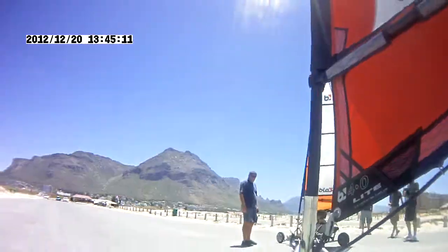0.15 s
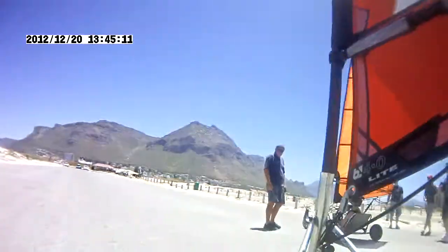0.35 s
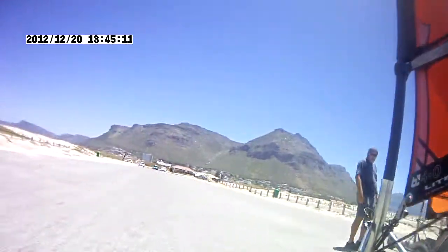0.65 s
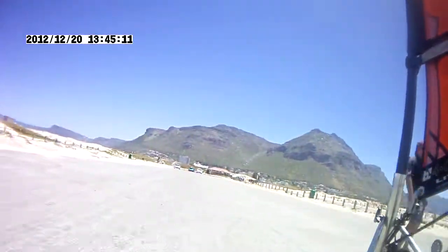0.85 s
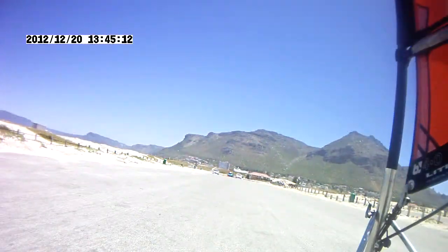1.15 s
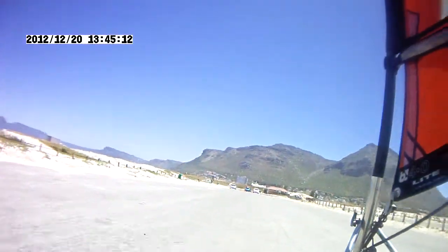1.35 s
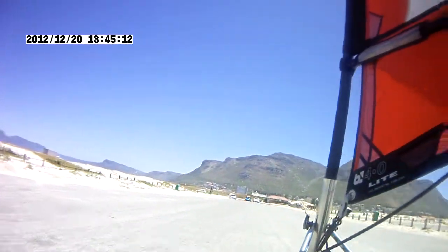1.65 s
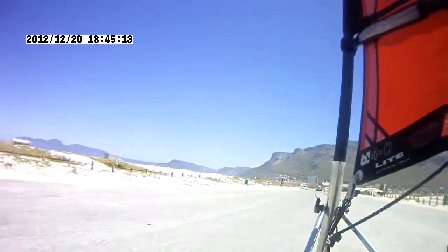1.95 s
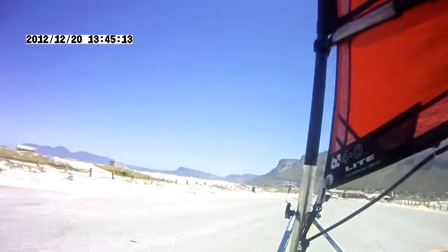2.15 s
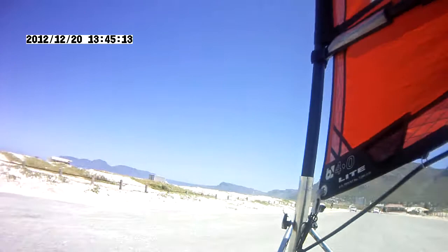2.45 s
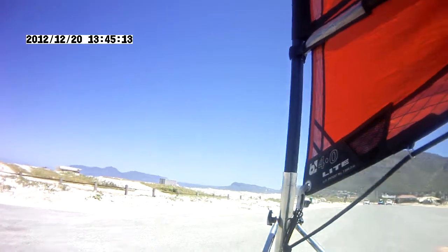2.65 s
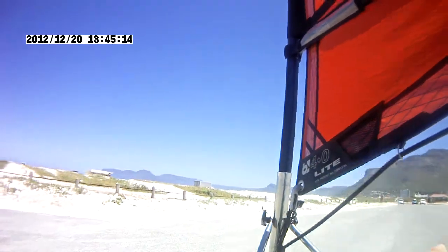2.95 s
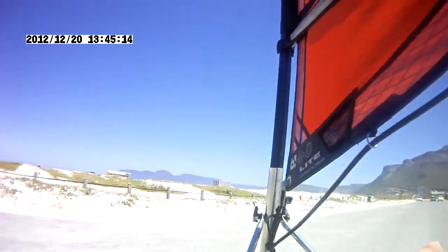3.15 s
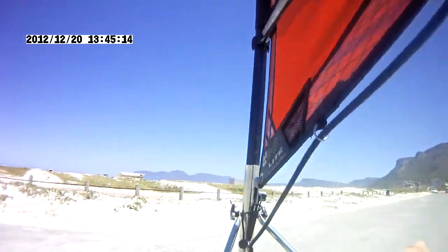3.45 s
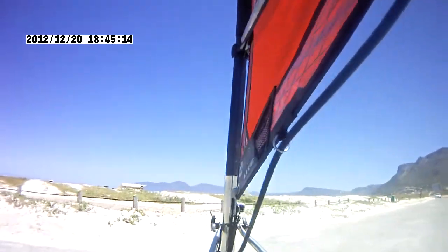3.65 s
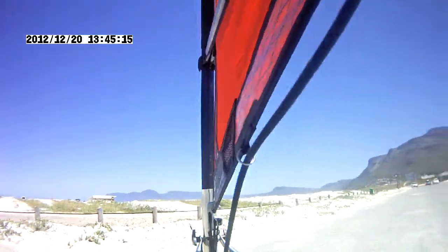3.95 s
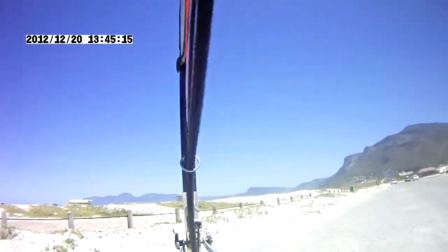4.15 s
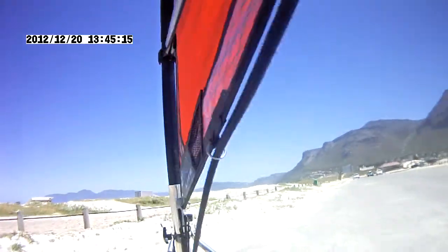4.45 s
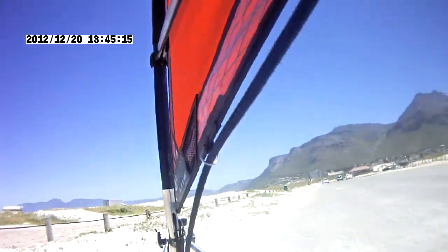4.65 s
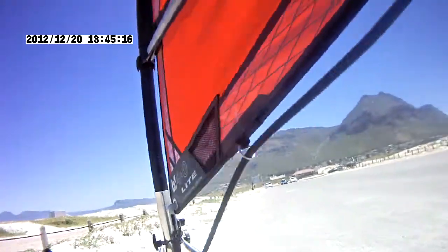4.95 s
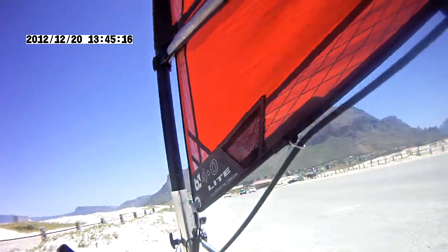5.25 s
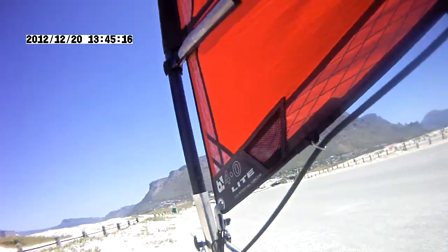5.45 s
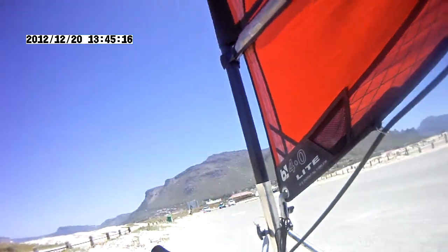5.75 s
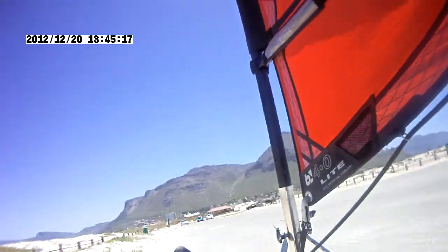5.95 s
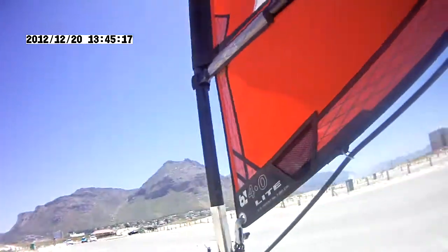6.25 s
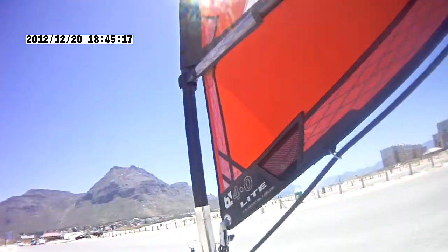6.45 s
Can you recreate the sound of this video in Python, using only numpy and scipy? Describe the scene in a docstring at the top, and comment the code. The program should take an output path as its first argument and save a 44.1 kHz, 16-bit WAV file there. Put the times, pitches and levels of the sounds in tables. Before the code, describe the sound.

Tyres crackle and hiss over gritty ground as a loose fitting knocks sharply on a metal frame, densest from one to three and a half seconds.

```python
"""On gritty pavement a land yacht rolls along, heard from close by: a small camera fixed to its frame.
A loose fitting knocks on the frame as the sail flaps, and rigging ticks: blows ring decaying modes.
Grit crackles under the tyres as swells of grains; the road drones in the frame's resonances.
Filtered grains and noise make the sandy hiss, the brief swishes, the rumble, the wind and the camera's floor."""
import sys
import numpy as np
from scipy import signal
from scipy.io import wavfile
from scipy.ndimage import uniform_filter1d

SR = 44100
rng = np.random.default_rng(int(sys.argv[2]) if len(sys.argv) > 2 else 0)


def output_pcm(signal):
    """Save a mono or channel-first signal as 16-bit PCM at the path in sys.argv[1].

    Samples are clipped to [-1, 1] before scaling.
    """
    pcm = np.clip(np.atleast_2d(signal).T, -1, 1) * 32767
    wavfile.write(sys.argv[1], SR, np.round(pcm).astype(np.int16))


N = 291501

# loose fitting on the frame, the clear blows: (time [s], peak level [dB], contact time [microseconds])
BLOWS = [(0.7087, -10, 22), (1.0981, -10, 35), (1.1848, -12, 12), (1.1907, -3.5, 6), (1.2355, -20, 82),
         (1.2471, -3, 14), (1.2798, -24, 63), (1.2987, -20, 50), (1.4753, -5.5, 24), (1.5048, -22, 37),
         (1.5517, -28, 17), (1.5683, -18.5, 41), (1.5799, -4, 21), (1.6522, -24, 42), (1.663, -30, 30),
         (1.6948, -25.5, 104), (1.7154, -26.5, 45), (1.7729, -31, 100), (1.898, -21, 26),
         (1.9076, -12.5, 31), (1.9877, -24.5, 54), (2.0467, -27.5, 100), (2.1915, -6, 14), (2.231, -24, 35),
         (2.2398, -23.5, 7.6), (2.2474, -13, 38), (2.1435, -34.5, 64), (2.2987, -28, 71), (2.3054, -35, 60),
         (2.346, -23.5, 11), (2.3659, -18, 53), (2.3946, -23.5, 23), (2.4719, -11, 34), (2.5267, -24, 78),
         (2.58, -8.5, 32), (2.6321, -18, 39), (2.6858, -19.5, 48), (2.7118, -24.5, 40), (2.7678, -24, 61),
         (2.7802, -4, 21), (2.8963, -5, 24.5), (2.9397, -24, 46), (2.9715, -31, 70), (3.0029, -19, 27),
         (3.011, -17.5, 61), (3.0689, -7, 23.5), (3.3047, -18, 39), (3.412, -9, 26), (3.486, -28, 59),
         (3.7582, -33.5, 77), (4.5269, -29, 33), (4.5806, -35, 20), (4.64, -27, 73), (4.6552, -0.5, 5.4),
         (4.844, -34.5, 9.6), (4.9431, -33.5, 82), (5.1943, -37, 10), (5.2048, -40, 11), (5.4823, -31, 51),
         (5.6153, -30.5, 18), (6.0945, -24, 32), (6.1003, -20.5, 73)]
# what a blow on the frame rings with:
# (frequency [Hz], decay by 60 dB [s], relative level [dB], polarity and weight [factor])
FRAME_MODES = [(139, 0.015, -31.5, -1.05), (410, 0.036, -40.5, 0.63), (596, 0.0082, -19.5, -0.75),
               (753, 0.031, -19, -0.93), (956, 0.046, -27, -0.96), (1113, 0.033, -12, -0.71),
               (1545, 0.017, -8, 0.97), (1745, 0.019, -9, 0.96), (2063, 0.0061, -0.87, 0.89),
               (2446, 0.023, -13, 0.99), (3060, 0.0095, -10, -1.46), (3690, 0.0037, 1.5, -1.134),
               (4318, 0.0038, 3.5, 1), (4943, 0.01, -4, -1.02), (5600, 0.01, -10, 1),
               (6130, 0.012, -13.5, -1.86), (6576, 0.0082, -3.5, -0.81), (7486, 0.0034, 0.5, 1),
               (9100, 0.0081, -18, 0.96), (9720, 0.01, -18.5, 0.97)]
# hull and ground send the blow back: (lag [s], level [dB])
FRAME_ECHOES = [(.00217, 2.16), (.00384, -7.5), (.00635, -11)]
ECHO_HZ = 1300  # the echoes lose what lies above
# faint taps at random: level over the grit, spread above that, typical contact time
TAP_OVER_GRIT_DB, TAP_SPREAD_DB, TAP_CONTACT_US = 14.5, 3, 25


def knocks(grit_db):
    """A softer contact pushes longer and loses treble; chatter surrounds the blow, more so in light ones."""
    out = np.zeros(N)
    t = np.arange(-200, 401) / SR
    taps = scattered(28, grit_db, TAP_OVER_GRIT_DB, TAP_SPREAD_DB, TAP_CONTACT_US)
    for s, db, contact_us in [*BLOWS, *taps]:
        push = np.exp(-.5 * (1e6 * t[150:251] / max(contact_us, 4)) ** 2)
        swell = np.exp(np.where(t < 0, t / 0.001, -t / 0.0013))
        chatter = band(swell * rng.standard_normal(len(t)), 3740, 9600)
        blow = (t == 0) + undb(-27.5 - 0.43 * db) * chatter
        answer = ring(FRAME_MODES, 1.5, FRAME_ECHOES)
        add(out, s, db, signal.fftconvolve(np.convolve(blow, push), answer))
    return out


# light metal ticks in the rigging: (time [s], peak level [dB])
RIGGING_TICKS = [(1.5606, -37), (2.7992, -28), (3.703, -40), (3.7755, -32.5), (4.3327, -26), (4.7324, -32),
                 (4.778, -28.5), (4.7964, -27.5), (4.804, -18.5), (4.816, -31), (4.827, -25), (4.981, -33),
                 (5.164, -33), (6.4967, -33)]
# what a tick rings with:
# (frequency [Hz], decay by 60 dB [s], relative level [dB], polarity and weight [factor])
RIGGING_MODES = [(2840, 0.0073, -4, 0.72), (4000, 0.0081, 1.5, -0.59), (4550, 0.004, -2, 0.31),
                 (5260, 0.014, -1.5, -0.37), (6300, 0.0046, -6.5, 0.87), (7400, 0.011, -20, -0.75),
                 (8850, 0.0066, -15, 0.91), (10600, 0.012, -33, -1.1)]


def ticks():
    """Each tick strikes the small metal parts in another spot and rattles for a moment."""
    out = np.zeros(N)
    t = np.arange(200) / SR
    for s, db in RIGGING_TICKS:
        noise = band(rng.standard_normal(len(t)), 4000, 5000)
        rattle = (t == 0) + 0.25 * np.exp(-t / 0.0008) * noise
        add(out, s, db, signal.fftconvolve(rattle, ring(RIGGING_MODES, 2.0)))
    return out


# the heaviest patches of grit crushed under a tyre: (middle [s], length [s], level of the wide band [dB])
HEAVY_PATCHES = [(0.61, 0.011, -52.5), (0.636, 0.0054, -49), (0.661, 0.02, -51), (0.927, 0.041, -51),
                 (1.233, 0.039, -44), (1.27, 0.027, -42), (1.456, 0.073, -47.5), (1.528, 0.013, -44),
                 (1.557, 0.015, -40.5), (1.696, 0.024, -51), (2.218, 0.026, -51), (2.375, 0.017, -50),
                 (2.452, 0.025, -50), (2.537, 0.074, -50), (2.66, 0.053, -50), (2.708, 0.013, -49),
                 (2.758, 0.028, -45), (2.988, 0.021, -41.5), (3.044, 0.015, -43), (3.128, 0.026, -50),
                 (3.434, 0.015, -46.5), (3.516, 0.015, -48.5), (3.699, 0.019, -46.5), (3.785, 0.032, -51.5),
                 (3.831, 0.01, -50.5), (4.05, 0.0097, -50.5), (5.167, 0.018, -42), (5.462, 0.0094, -47),
                 (6.172, 0.025, -51), (6.534, 0.0091, -47), (6.578, 0.0075, -47)]
# lighter patches at random: level over the grit, spread above that, typical length
PATCH_OVER_GRIT_DB, PATCH_SPREAD_DB, PATCH_S = 1, 0.9, .018
CRUNCH_HZ, CRUNCH_OCT_PER_DB = 3330, -.05  # at grit of -57 dB; coarser, louder grit crunches lower


def crunches(grit_db):
    """Each patch is a swell of dense grains in a wide band, with a little of the frame's drone."""
    out = np.zeros(N)
    offset = np.arange(-2000, 2000)
    grit = unit(rng.standard_normal(N) + 1.9 * unit(grains(1500, 4.5, 16.0)))
    light = scattered(55, grit_db, PATCH_OVER_GRIT_DB, PATCH_SPREAD_DB, PATCH_S)
    for s, length, db in [*HEAVY_PATCHES, *light[:, [0, 2, 1]]]:
        middle = int(s * SR)
        at = np.clip(middle + offset, 0, N - 1)
        hz = CRUNCH_HZ * 2 ** (CRUNCH_OCT_PER_DB * (grit_db[middle] + 57))
        wide = unit(band_twice(grit[at], hz, 0.61 * hz))
        frame = unit(band(grit[at], 1520, 440))
        swell = np.exp(-(offset / SR / (0.42 * length)) ** 2)
        out[at] += undb(db) * swell * (wide + 0.62 * frame)
    return out


# how the road sounds along the way:
# (time [s], frame drone level [dB], grit reference level [dB], sand level [dB])
ROAD = [(0.0, -58, -70, -59), (0.64, -54.5, -64, -61), (0.83, -53, -62.5, -52), (1.21, -51, -57.5, -56),
        (1.4, -47.5, -54, -57), (1.93, -49, -55.5, -57), (2.17, -49, -54.5, -63), (2.56, -54.5, -50, -59),
        (2.85, -48, -53, -65.5), (3.22, -51.5, -55.5, -63), (3.92, -61, -64, -61), (4.4, -58.5, -60.5, -58),
        (4.69, -53.5, -59.5, -56.5), (4.9, -53.5, -60.5, -52.5), (5.59, -54, -64.5, -60),
        (5.96, -52.5, -62.5, -59), (6.28, -56.5, -61.5, -57), (6.61, -58, -67.5, -56)]


def road_levels():
    """Drone, grit and sand levels glide in dB from one stretch of road to the next."""
    s, *columns = np.transpose(ROAD)
    return [np.interp(np.arange(N) / SR, s, column) for column in columns]


# resonances of the frame over the road: (frequency [Hz], width [Hz], relative level [dB])
DRONE_MODES = [(566, 420, -18.5), (817, 83, -4.5), (1073, 85, -3), (1320, 270, -5), (1426, 116, 1.5),
               (1600, 185, -4.5)]
# sand in the tread: (frequency [Hz], relative level [dB per Hz])
SAND_SPECTRUM = [(2250, -26), (2835, -3), (3400, -4), (4200, 5.5), (5000, -12.5), (6000, 5.5), (7200, -48),
                 (8000, -36)]
STONES_DB = 2.5  # stones against the grit level
HISS_DB, HISS_PER_DB = -68.5, 1.02  # hiss at sand of -58 dB, growth per dB of sand


def rolling(drone_db, grit_db, sand_db):
    """Road texture shakes the frame; stones and sand crackle in the tread, in patches."""
    bumps = undb(1.95 * walk(55))
    road = bumps * (rng.standard_normal(N) + 0.62 * unit(grains(500, 0.8, 14)))
    # neighbouring modes take opposite polarity
    drone = sum((-1) ** k * undb(db) * band(road, hz, width)
                for k, (hz, width, db) in enumerate(DRONE_MODES))

    patches = undb(2.4 * walk(110))
    hits = patches * uniform_filter1d(grains(400, 3.0, 17.0), size=4)
    struck = signal.fftconvolve(hits, ring(FRAME_MODES, 0., FRAME_ECHOES))[:N]
    stones = band(struck, 3150, 2260)  # rubber dulls the blows

    sand = patches * (rng.standard_normal(N) + 1.7 * unit(grains(900, 1.24, 20)))
    flutter = undb(1.5 * walk(130))
    hiss = patches * flutter * band(rng.standard_normal(N), 9000, 5200)
    hiss_db = HISS_DB + HISS_PER_DB * (sand_db + 58)
    return (undb(drone_db) * unit(drone)
            + undb(grit_db + STONES_DB) * unit(stones)
            + undb(sand_db) * flicker(sand, SAND_SPECTRUM, 2.8, 70, width=1 / 4)
            + undb(hiss_db) * unit(hiss))


# short hisses and squeaks, perhaps rope slipping through a block:
# (start [s], length [s], frequency [Hz], nominal width [Hz], level [dB])
ROPE_SWISHES = [(0.305, 0.14, 4700, 4800, -51.5), (4.798, 0.028, 8850, 220, -41),
                (4.856, 0.19, 5600, 600, -53.5), (4.877, 0.067, 3900, 300, -57),
                (5.03, 0.065, 5630, 600, -56.5)]


def swishes():
    """Fluttering bands of noise with soft edges."""
    out = np.zeros(N)
    t = np.arange(N) / SR
    for start, length, hz, width, db in ROPE_SWISHES:
        rise = (t - start) / 0.0046
        fall = (start + length - t) / (0.23 * length)
        gate = np.clip(np.minimum(rise, fall), 0, 1) * undb(1.0 * walk(110))
        noise = unit(band_twice(rng.standard_normal(N), hz, 1.14 * width))
        out += undb(db) * gate * noise
    return out


# low rumble: (frequency [Hz], relative level [dB per Hz])
RUMBLE_SPECTRUM = [(70, -8), (120, -1.5), (230, -1.5), (330, -6.5), (480, -13), (700, -31.5)]
RUMBLE_DB, RUMBLE_PER_DB = -63, 1  # at a drone of -53 dB; growth per dB of drone


def low_rumble(drone_db):
    """Low noise that follows the drone's level while each of its bands wavers."""
    level_db = RUMBLE_DB + RUMBLE_PER_DB * (drone_db + 53) + 3.0 * walk(30)
    return undb(level_db) * flicker(rng.standard_normal(N), RUMBLE_SPECTRUM, 1.28, 25, 0.7)


def wind():
    """Wind presses on the microphone: very deep noise, almost steady in level."""
    return undb(-64 + 0.48 * walk(2.9)) * unit(band(rng.standard_normal(N), 22.5, 32.4))


def own_noise():
    """The microphone's steady floor, a wide band of noise."""
    return undb(-71) * unit(band(rng.standard_normal(N), 540, 1000))


def undb(db):
    """Decibels to an amplitude factor."""
    return 10 ** (np.asarray(db) / 20)


def unit(x):
    """Scales a signal to an rms of 1."""
    return x / np.sqrt(np.mean(x ** 2))


def band(x, hz, width):
    """One resonance, gain 1 at the centre."""
    return signal.lfilter(*signal.iirpeak(hz, hz / width, fs=SR), x)


def band_twice(x, hz, width):
    """Two equal resonances in a row, for steeper skirts."""
    return band(band(x, hz, width), hz, width)


def walk(rate):
    """Random levels held 1 / rate s and slewed twice, with an rms of 1."""
    k = int(SR / rate)
    held = np.repeat(rng.standard_normal(N // k + 1), k)
    return unit(uniform_filter1d(uniform_filter1d(held, k), k)[:N])


def grains(rate, spread_db, most_db):
    """Random clicks, on average rate per second, many small and few large."""
    when, size, side = rng.random((N, 3)).T
    db = np.minimum(-spread_db * np.log(1 - size), most_db)
    return (when < rate / SR) * undb(db) * np.sign(side - .5)


def flicker(source, spectrum, own_db, own_rate, width):
    """Third-octave spaced bands of a source, each wavering in level by itself; width is per Hz of centre."""
    hz, db = np.transpose(spectrum)
    centres = hz[0] * 2 ** np.arange(0, np.log2(hz[-1] / hz[0]), 1 / 3)
    polarity = (-1) ** np.arange(len(centres))  # neighbours add where they overlap
    gains = polarity * undb(np.interp(np.log(centres), np.log(hz), db))
    return unit(sum(gain * undb(own_db * walk(own_rate)) * band_twice(source, f, f * width)
                    for f, gain in zip(centres, gains)))


def ring(modes, scatter_db=0., echoes=(), size=4096):
    """Answer of a struck body: decaying modes and their duller echoes."""
    hz, t60, db, sign = np.transpose(modes)[:, :, None]
    gain = sign * undb(db + scatter_db * rng.standard_normal(hz.shape))
    t = np.arange(size) / SR

    def struck(u):
        return np.sin(2 * np.pi * hz * u) * np.exp(-np.log(1000) * u / t60)

    back = sum(undb(level) * struck(np.maximum(t - lag, 0)) for lag, level in echoes)
    return np.sum(gain * (struck(t) + back / (1 + (hz / ECHO_HZ) ** 2)), axis=0)


def add(out, s, db, sound):
    """Lays a sound down at a peak level of db, with its peak at s."""
    start = max(int(s * SR) - np.argmax(np.abs(sound)), 0)
    room = out[start:start + len(sound)]
    room += undb(db) * sound[:len(room)] / np.abs(sound).max()


def scattered(count, grit_db, over_db, spread_db, typical):
    """Rows (time [s], level [dB], size) at random moments, with levels that ride on the grit there."""
    when, loud, size = rng.random((count, 3)).T
    s = when * (N - 1) / SR
    db = grit_db[(s * SR).astype(int)] + over_db - spread_db * np.log(1 - .9 * loud)
    return np.transpose([s, db, typical * 3.6 ** (size - .5)])


def scene():
    """All sources as they reach the camera on the frame, from the knocks to the floor."""
    drone_db, grit_db, sand_db = road_levels()
    close = knocks(grit_db) + ticks() + crunches(grit_db)
    road = rolling(drone_db, grit_db, sand_db) + swishes()
    background = low_rumble(drone_db) + wind() + own_noise()
    return (close + road + background)[None]


def record(dry):
    """The camera rounds the loudest peaks and cuts the top above 11050 Hz."""
    rounded = np.tanh(1.5 * dry) / 1.5
    top_cut = signal.ellip(10, .3, 70, 11050, fs=SR, output="sos")
    return signal.sosfilt(top_cut, rounded)


dry = scene()
out = record(dry)
output_pcm(out)
```